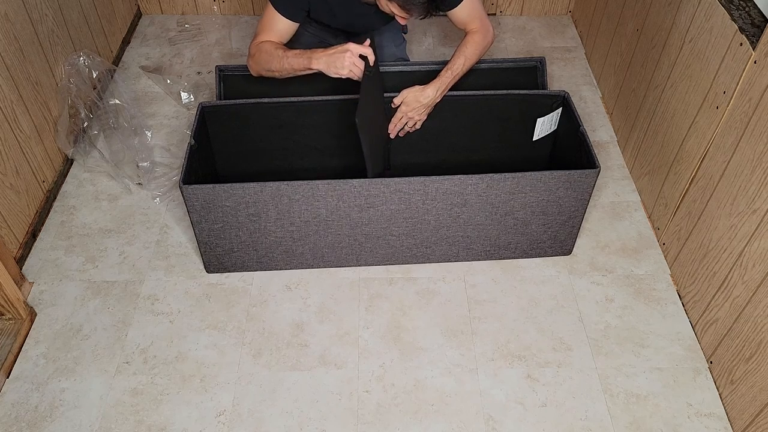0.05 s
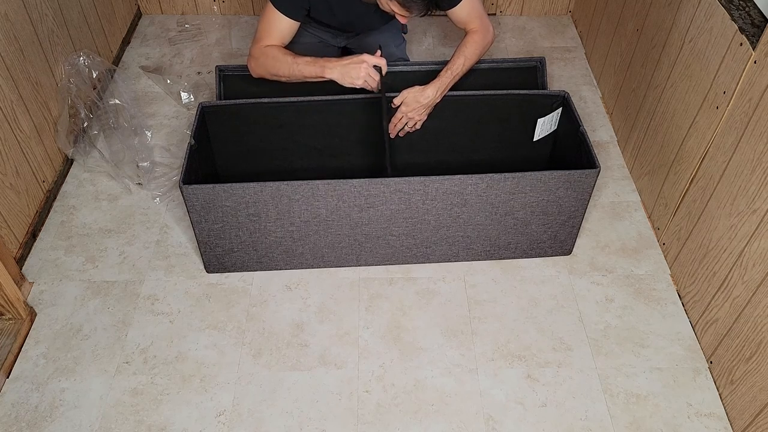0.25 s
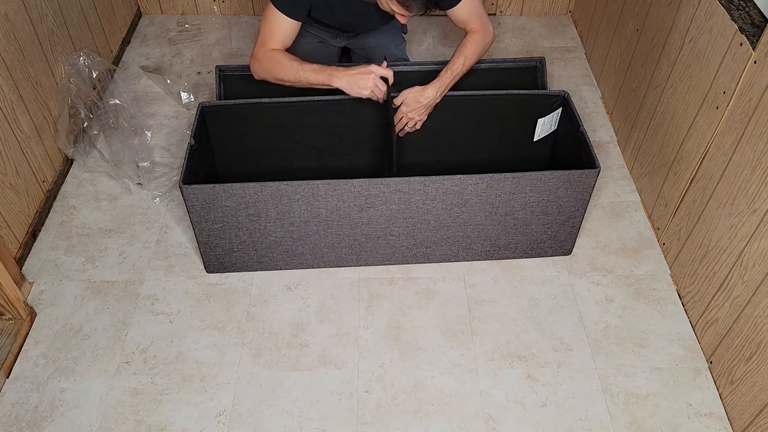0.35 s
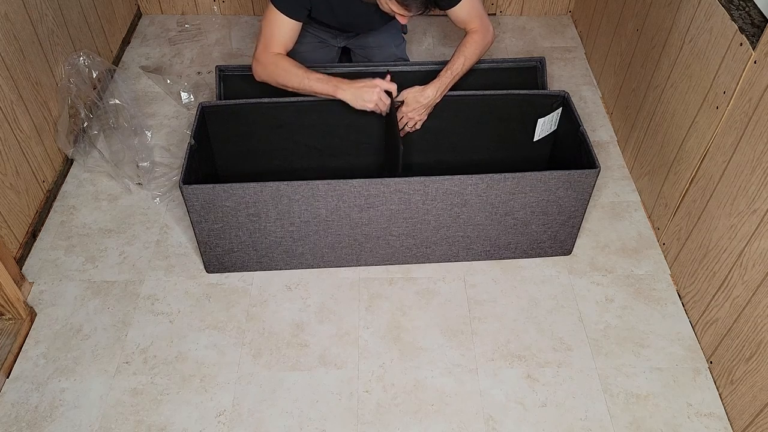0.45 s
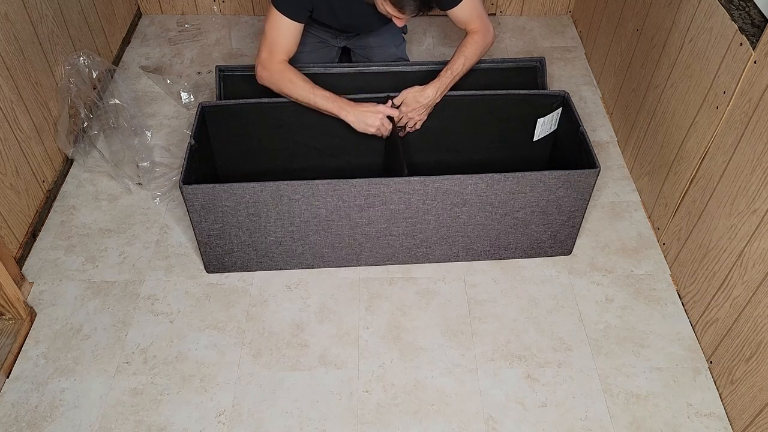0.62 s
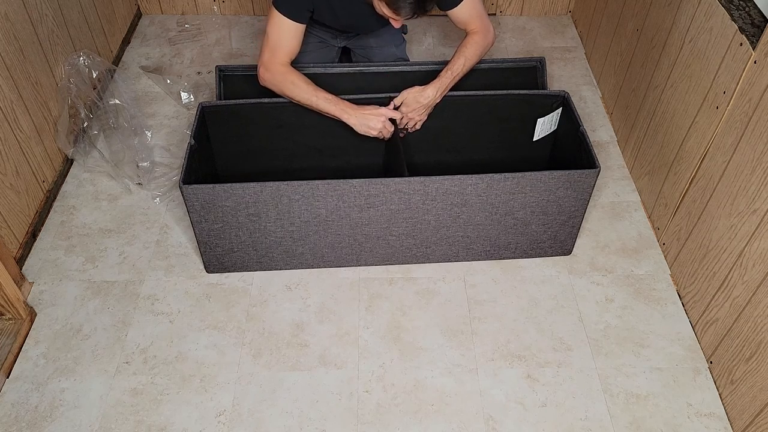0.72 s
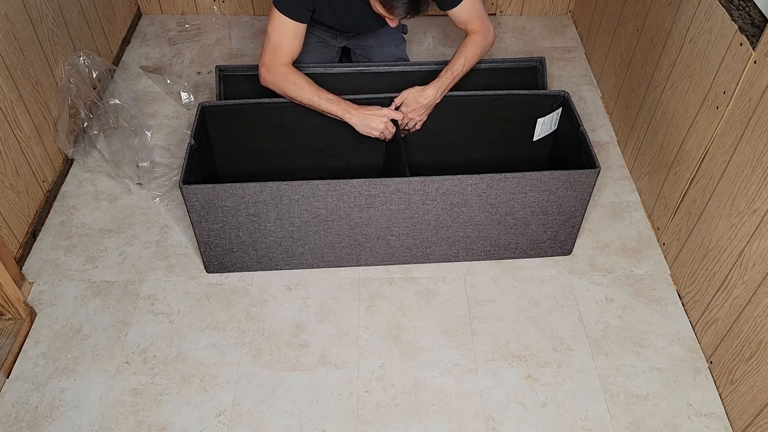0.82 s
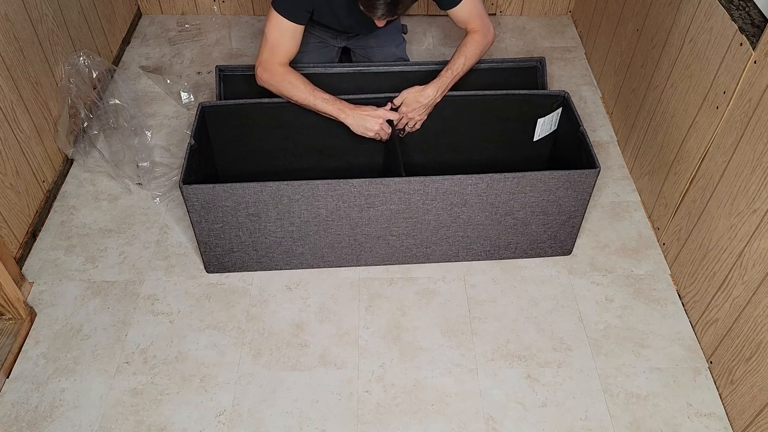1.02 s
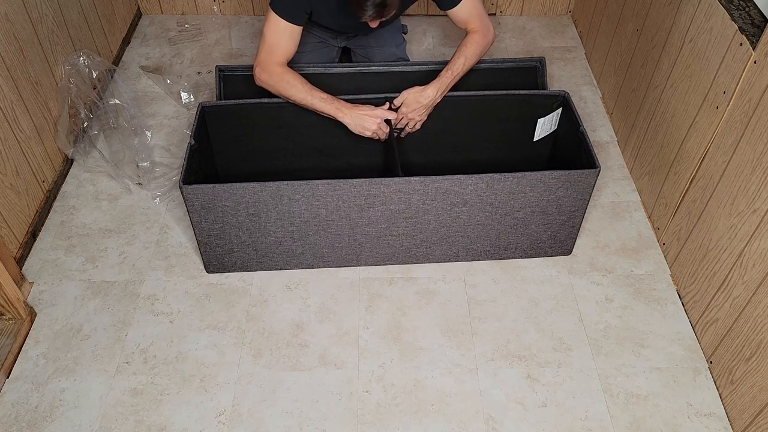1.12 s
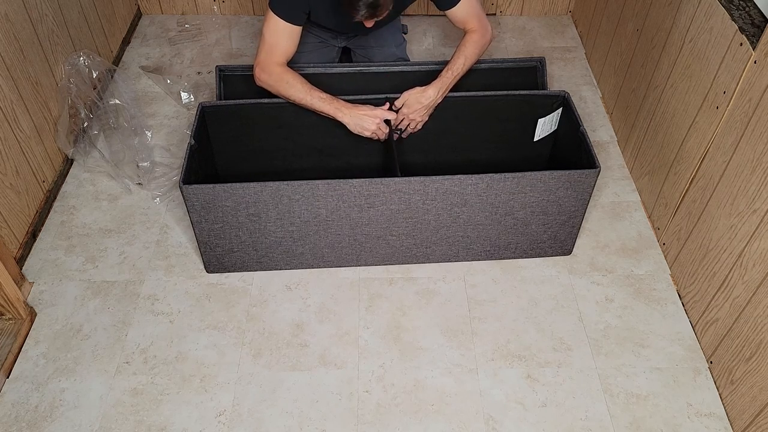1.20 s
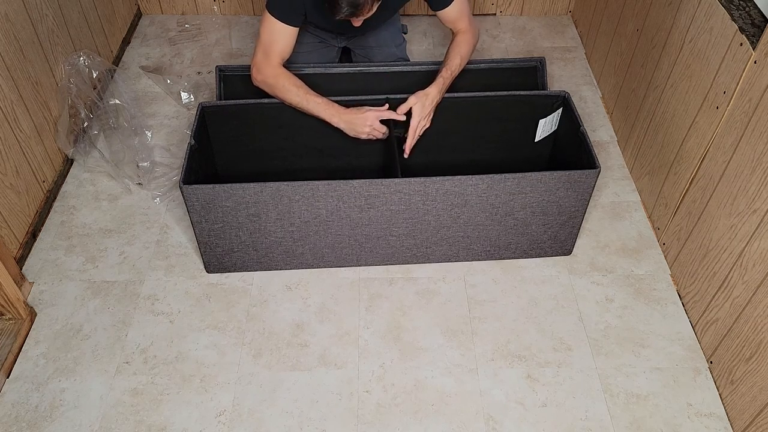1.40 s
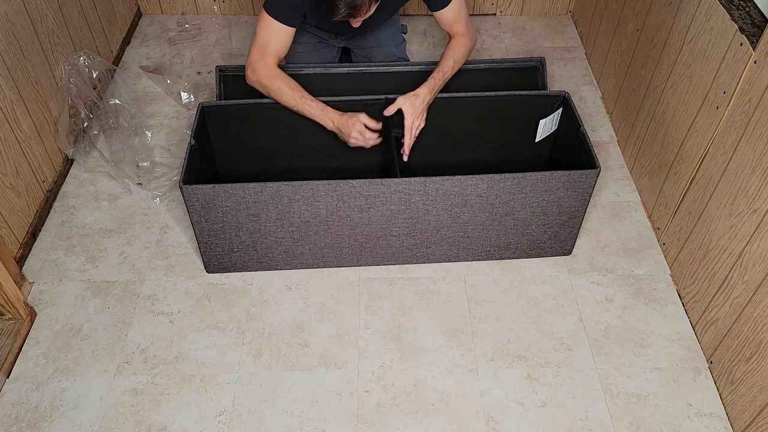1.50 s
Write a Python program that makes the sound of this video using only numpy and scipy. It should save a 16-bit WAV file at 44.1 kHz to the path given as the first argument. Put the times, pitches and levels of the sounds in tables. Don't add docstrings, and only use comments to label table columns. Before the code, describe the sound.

A wooden panel slides into a fabric-covered box in a small, quiet, faintly humming room. Fingers brush cloth at the start and a light tap comes at 0.14 s. A dry, gritty scrape grows from 0.25 s, loudest near 0.5 s, turning hissier and hollower. It lands with dull double knocks at 0.75 s, then a padded thud at 0.87 s. Soft cloth brushes follow, with small taps around 1.2 s and a bright last brush at 1.45 s.

```python
import sys
import numpy as np
from scipy import signal
from scipy.fft import rfft, irfft, next_fast_len
from scipy.io import wavfile
from scipy.ndimage import map_coordinates

SR = 44100
rng = np.random.default_rng(int(sys.argv[2]) if len(sys.argv) > 2 else 0)


def generate_wav(sig):
    pcm = np.round(np.clip(np.atleast_2d(sig).T, -1, 1) * 32767).astype(np.int16)
    wavfile.write(sys.argv[1], SR, pcm)


def level_to_linear(level):
    exponent = np.asarray(level, float) / 20
    return 10 ** exponent


N = 68355

# f/Hz, level/dB
HUSH_SPECTRUM = [(250, -18), (400, -0.5), (800, -2), (1500, -3), (3500, -6), (7500, -9.5), (9000, -18),
                 (15700, -27)]
RUMBLE_SPECTRUM = [(12, -30), (25, -8), (60, 0), (120, -4), (160, -9.5), (300, -11.5), (500, -23),
                   (900, -71)]
# f/Hz, width/Hz, level/dB
HUM_DRONES = [(32.2, 11, -3.5), (53, 5.2, -0.5), (78, 7, 1.5), (113.4, 13, 0), (206.8, 13, -3.5)]
HUSH_DB, RUMBLE_DB, HUM_DB = -61.5, -56.5, -61

# f/Hz, T60/s
ROOM_DECAY = [(200, 0.37), (1000, .25), (4000, 0.21), (12000, 0.12)]
# f/Hz, correlation/1
PORT_LIKENESS = [(60, 0.96), (130, 0.82), (290, 0.75), (640, -0.31), (1410, -0.14), (3100, -0.097),
                 (6820, 0.061), (15000, 0.016)]
# f/Hz, level/dB
PORT_BALANCE = [(200, 0), (2400, 1.5), (6000, -0.5), (9000, -3.5), (12000, -8.5), (15000, -11.5)]
EDGE_LAGS = (0.00048, -0.000334)
WET_DB, GAP_S = 6, 0.003
MOVE_S = 0.08
CLOSE_DB = -5
TOP_HZ = 15760

# t/s, length/s, level/dB, rise share/1, tilt/(dB per octave)
BRUSHES = [
    (-.04, 0.09, -50.5, 0.28, -.5),
    (0.798, 0.093, -52, .3, 0),
    (0.844, .09, -52, 0.76, -.3),
    (.93, .23, -65, .6, 0.5),
    (1.199, 0.038, -55, 0.08, -.5),
    (1.277, 0.22, -60, 0.1, 1),
    (1.452, .075, -53.5, 0.41, 2.5),
]
# f/Hz, level/dB
CLOTH_SPECTRUM = [(300, -31), (700, -3.5), (1500, -3.5), (2800, 1), (4500, -1), (7500, -5), (9000, -13.5),
                  (15700, -19.5)]

# t/s, level/dB, thud level/dB, tilt/(dB per octave)
KNOCKS = [
    (.141, -53, -62, 2.5),
    (.681, -48, -60, 5),
    (.742, -37, -57, -1.2),
    (.75, -37, -55, -1),
    (.866, -66, -51, .2),
    (.911, -53, -66, 4.5),
    (1.203, -47, -68, .3),
    (1.234, -56, -68, 7),
]
# f/Hz, level/dB, T60/s
PANEL_MODES = [(600, -12, 0.017), (810, 1.5, .028), (1050, -3, .018), (1400, -4, .015), (1900, -6, .014),
               (2230, -3, .016), (2800, -.5, .016)]
THUD_HZ, THUD_T60_S = 125, 0.039
CRACK_DB, CRACK_T60_S, CRACK_HZ = 6, 0.012, 2500
PADDING_S = 0.0015

# t/s, scrape level/dB, nap (share of fine fibres combed)/1
SLIDE = [
    (.138, -57, .2),
    (.21, -52.5, 0),
    (.29, -42, 0.1),
    (.345, -42.5, 0.3),
    (.41, -36, 0.44),
    (.52, -34, 0.07),
    (.61, -37, 0.74),
    (.7, -36, 1),
    (.75, -40, .6),
    (.81, -55.5, 0.1),
]
# f/Hz, width/Hz, level/dB
EDGE_RESONANCES = [(2080, 1260, -8), (2770, 320, 2.5), (3080, 410, 1), (3530, 380, 2.5), (4180, 600, -1.5),
                   (5110, 890, -3.5), (6780, 1870, -8)]
# f/Hz, width/Hz, level/dB
BOX_RESONANCES = [(777, 550, -4.5), (1320, 400, 2), (1770, 360, -2)]
# f/Hz, level/dB
FIBRE_SPECTRUM = [(2350, -27.5), (4000, -4), (7680, 0), (9010, -5.5), (14800, -12.5), (15700, -15)]
WEAVE_SPECTRUM = [(300, -21), (600, -9), (1200, -5), (2500, -2), (4500, -2), (7500, -6.5), (9000, -20.5),
                  (15700, -30)]
EDGE_LEVELS = (-0.65, -2.22)
LIFT_S = 0.003
FIBRES_DB, NAP_DB = -7.5, 10
BODY_DB, DEPTH_DB = -29, 22.5
WEAVE_DB, WEAVE_GROWS = -12, 0.41
SLIPS_PER_S, SLIP_SPREAD_DB, SMOOTH_SHARE = 3500, 5.5, 0.46
SWAY_DB, FLICKER_DB = 0.5, 0.8


def unit(x):
    return x / np.sqrt(np.mean(x ** 2) + 1e-20)


def along(points, hz):
    f, v = np.transpose(points)
    return np.interp(np.log(hz + 1), np.log(f + 1), v)


def filtered(x, response):
    m = next_fast_len(x.shape[-1] + SR // 2)
    spectrum = rfft(x, m) * response(np.fft.rfftfreq(m, 1 / SR))
    return irfft(spectrum, m)[..., :x.shape[-1]]


def resonant(x, peaks):
    def response(f):
        total = 0
        for k, (centre, width, db) in enumerate(peaks):
            damping = 1j * f * width
            total = total + (-1) ** k * level_to_linear(db) * damping / (centre ** 2 - f ** 2 + damping)
        return total
    return filtered(x, response)


def coloured(x, spectrum):
    return filtered(x, lambda hz: level_to_linear(along(spectrum, hz)))


def wobble(rate):
    knots = rng.standard_normal(int(N * rate / SR) + 4)
    return map_coordinates(knots, [np.arange(N) * rate / SR])


def diffuse(pair):
    def mixing(hz):
        angle = np.arccos(np.clip(along(PORT_LIKENESS, hz), -1, 1)) / 2
        return np.array([np.cos(angle), np.sin(angle)])
    mid, side = filtered(pair, mixing)
    return np.array([mid + side, mid - side])


def background():
    noise = rng.standard_normal((3, 2, N))
    hush = level_to_linear(HUSH_DB + 0.46 * wobble(6)) * unit(coloured(noise[0], HUSH_SPECTRUM))
    rumble = level_to_linear(RUMBLE_DB) * unit(coloured(noise[1], RUMBLE_SPECTRUM))
    hum = level_to_linear(HUM_DB) * unit(resonant(resonant(noise[2], HUM_DRONES), HUM_DRONES))
    return diffuse(hush + rumble + hum)


def ports(x, lag_s):
    side = np.array([[1], [-1]])
    return filtered(x, lambda f: np.exp(-1j * np.pi * f * lag_s * side))


def room(x, lag_s):
    wet, place = np.zeros((2, N)), np.arange(N) / SR / MOVE_S
    late = np.pad(x, (round(GAP_S * SR), 0))[:N]
    for k in range(int(place[-1]) + 2):
        hz, t, z = signal.stft(rng.standard_normal((2, SR // 4)), SR, nperseg=256)
        decay = level_to_linear(-60 * t / along(ROOM_DECAY, hz)[:, None])
        tail = diffuse(signal.istft(z * decay, SR, nperseg=256)[1])
        tail = tail / np.sqrt(np.sum(tail ** 2) / 2)
        part = late * np.cos(np.pi / 2 * np.clip(place - k, -1, 1))
        wet += signal.oaconvolve(part[None], tail, axes=1)[:, :N]
    return (ports(x, lag_s) + level_to_linear(WET_DB) * wet) / np.sqrt(1 + level_to_linear(2 * WET_DB))


def slips(rate):
    chance = rng.random(N)
    size = np.minimum(rng.exponential(size=N), 3)
    rub = rng.standard_normal((2, N))
    jerks = (chance < rate / SR) * level_to_linear(SLIP_SPREAD_DB * size) * np.sign(rub[0])
    return np.sqrt(1 - SMOOTH_SHARE) * unit(jerks) + np.sqrt(SMOOTH_SHARE) * rub[1]


def hands():
    t, out = np.arange(N) / SR, np.zeros(N)
    for start, length, db, rise, tilt_db in BRUSHES:
        u = (t - start) / length
        ramp = np.minimum(u / rise, (1 - u) / (1 - rise))
        swell = np.sin(np.pi / 2 * np.clip(ramp, 0, 1))
        cloth = [(hz, level + tilt_db * np.log2(hz / 3000)) for hz, level in CLOTH_SPECTRUM]
        out += level_to_linear(db) * swell * unit(coloured(slips(SLIPS_PER_S / 2), cloth))
    return out * level_to_linear(FLICKER_DB * wobble(39.2))


def knocks():
    out, t = np.zeros(N + SR), np.arange(SR // 5) / SR
    for start, db, thud_db, tilt_db in KNOCKS:
        ring = np.zeros(len(t))
        for hz, level, t60 in PANEL_MODES:
            mode_db = level + tilt_db * np.log2(hz / CRACK_HZ) + rng.normal(0, 2.5)
            ring += level_to_linear(mode_db - 60 * t / t60) * np.sin(2 * np.pi * (hz * t + rng.random()))
        crack = level_to_linear(CRACK_DB - 60 * t / CRACK_T60_S) * rng.standard_normal(len(t))
        crack = filtered(crack, lambda f: 2j * f / CRACK_HZ / (1 + 1j * f / CRACK_HZ) ** 3)
        thud = level_to_linear(thud_db - 60 * t / THUD_T60_S) * np.sin(2 * np.pi * THUD_HZ * t)
        softened = 1 - np.exp(-t / PADDING_S)
        out[round(start * SR):][:len(t)] += softened * (level_to_linear(db) * (ring + crack) + thud)
    return out[:N]


def slide():
    t = np.arange(N) / SR
    s, db, nap = np.transpose(SLIDE)
    touch = np.clip((t - s[0]) / LIFT_S, 0, 1) * np.clip((s[-1] - t) / LIFT_S, 0, 1)
    depth = np.clip((t - s[0]) / (s[-1] - s[0]), 0, 1)
    level_db = np.interp(t, s, db)

    edge = level_to_linear(FLICKER_DB * wobble(30.9)) * unit(resonant(slips(SLIPS_PER_S), EDGE_RESONANCES))
    hiss_db = FIBRES_DB + NAP_DB * (np.interp(t, s, nap) - 0.5)
    hiss = level_to_linear(hiss_db) * unit(coloured(slips(SLIPS_PER_S), FIBRE_SPECTRUM))
    body_db = BODY_DB + DEPTH_DB * depth ** 3
    body = level_to_linear(body_db) * unit(resonant(slips(SLIPS_PER_S / 3), BOX_RESONANCES))
    weave_db = WEAVE_DB + (1 - WEAVE_GROWS) * (db.max() - level_db)
    weave = level_to_linear(weave_db) * unit(coloured(slips(SLIPS_PER_S), WEAVE_SPECTRUM))
    return touch * level_to_linear(level_db + SWAY_DB * wobble(12.36)) * (edge + hiss + body + weave)


def scene():
    blows = knocks()
    near = level_to_linear(EDGE_LEVELS[0]) * slide() + hands() + blows
    far = level_to_linear(EDGE_LEVELS[1]) * slide()
    reflected = room(near, EDGE_LAGS[0]) + room(far, EDGE_LAGS[1])
    return reflected + level_to_linear(CLOSE_DB) * ports(blows, EDGE_LAGS[0]) + background()


def top_cut(x):
    return signal.sosfilt(signal.butter(12, 16060, fs=SR, output="sos"), x)


def record(dry):
    halves = np.array([[0.5], [-0.5]])
    mix = filtered(dry, lambda hz: (hz < TOP_HZ) * level_to_linear(along(PORT_BALANCE, hz) * halves))
    return top_cut(mix)


dry = scene()
out = record(dry)
generate_wav(out)
```